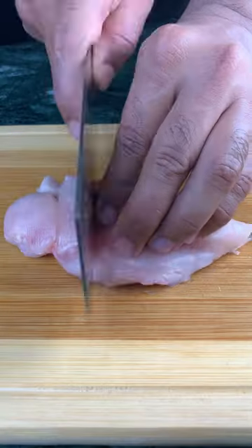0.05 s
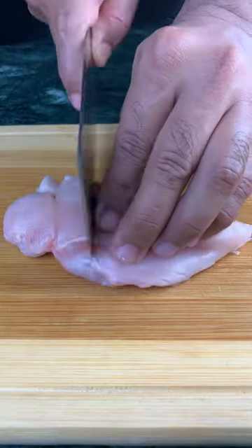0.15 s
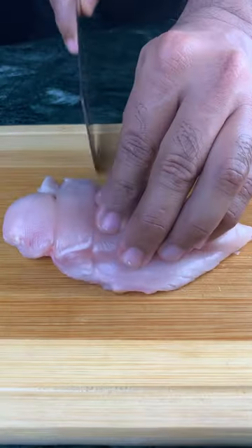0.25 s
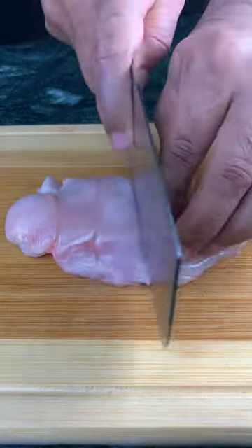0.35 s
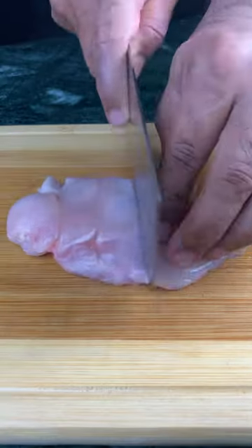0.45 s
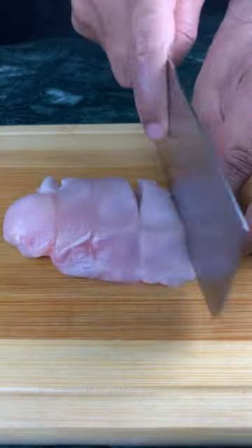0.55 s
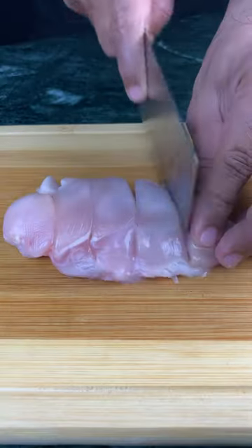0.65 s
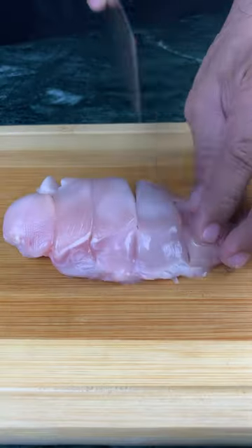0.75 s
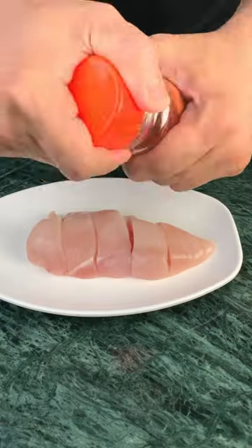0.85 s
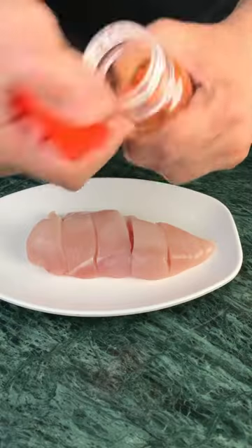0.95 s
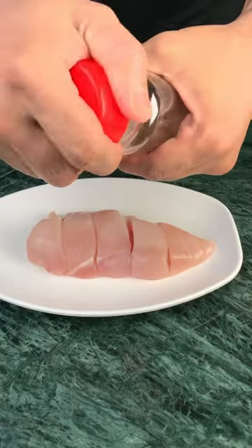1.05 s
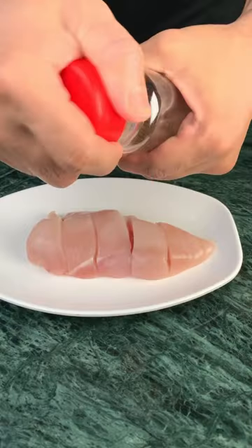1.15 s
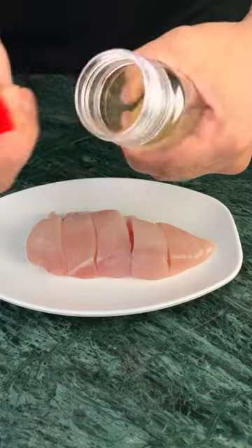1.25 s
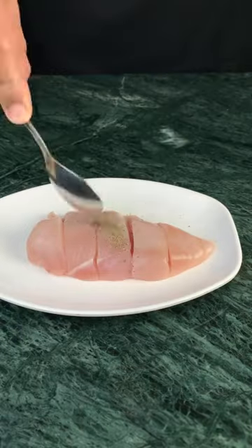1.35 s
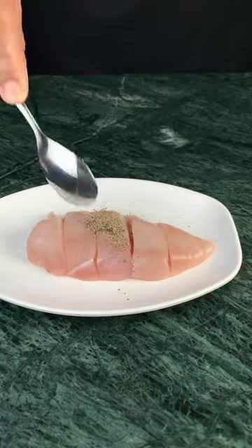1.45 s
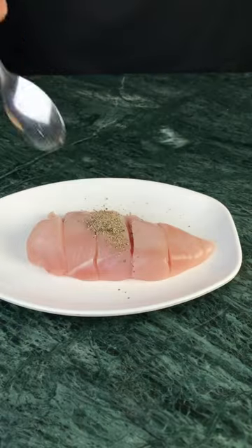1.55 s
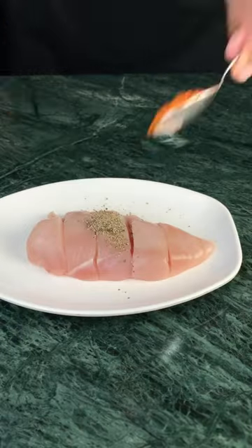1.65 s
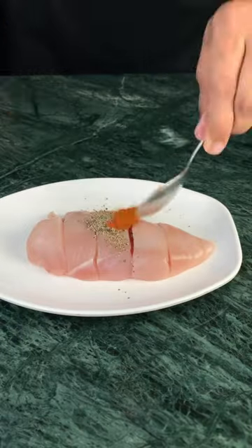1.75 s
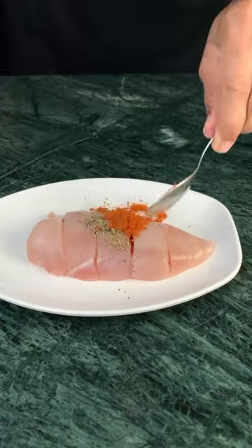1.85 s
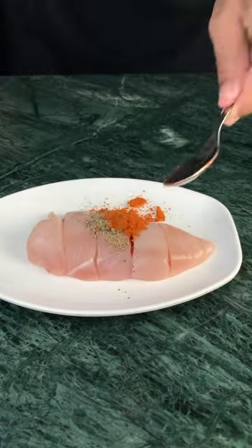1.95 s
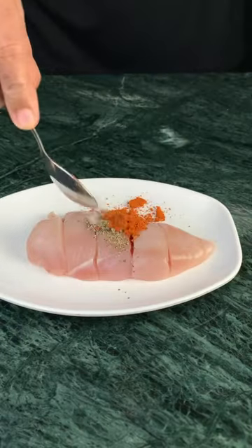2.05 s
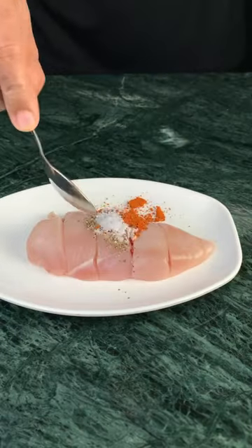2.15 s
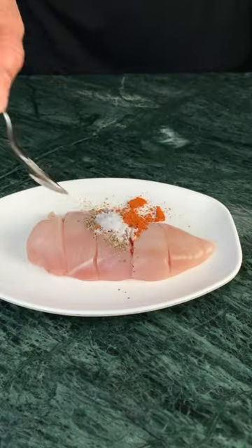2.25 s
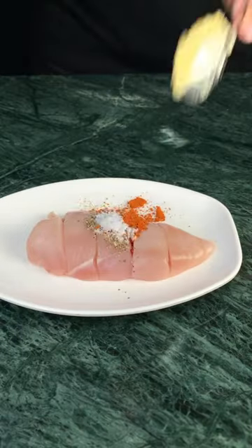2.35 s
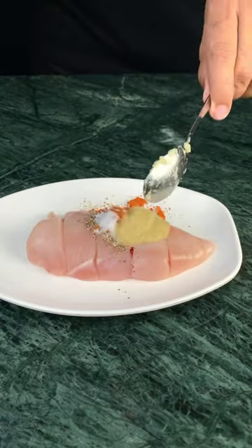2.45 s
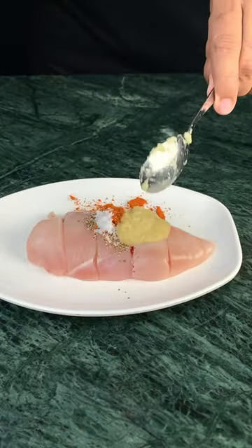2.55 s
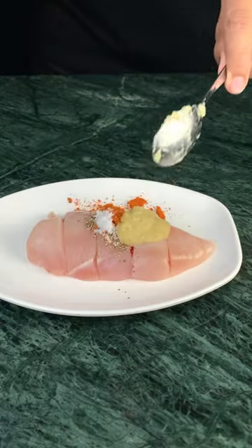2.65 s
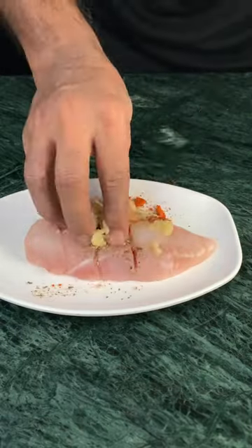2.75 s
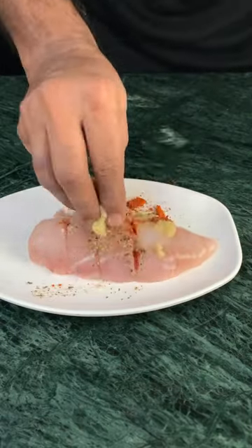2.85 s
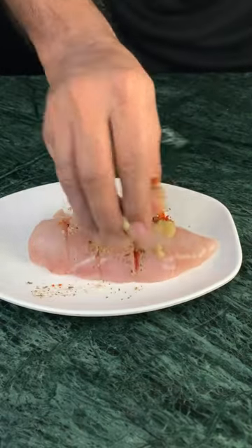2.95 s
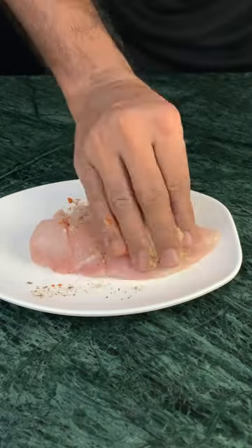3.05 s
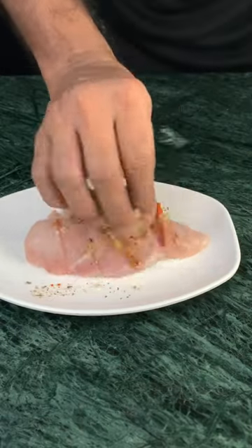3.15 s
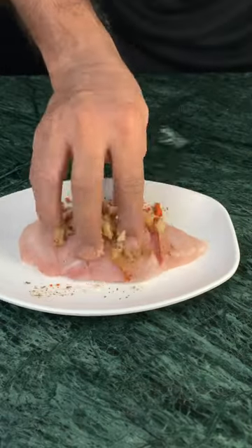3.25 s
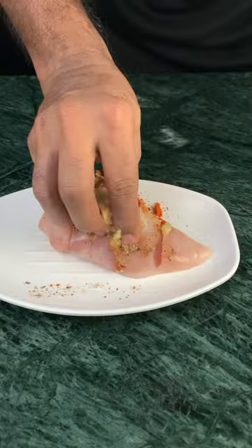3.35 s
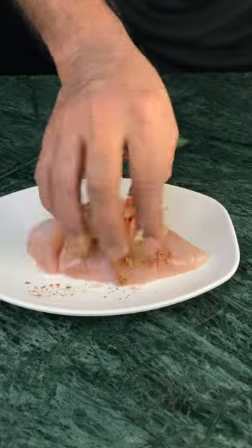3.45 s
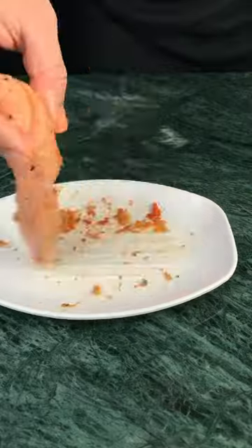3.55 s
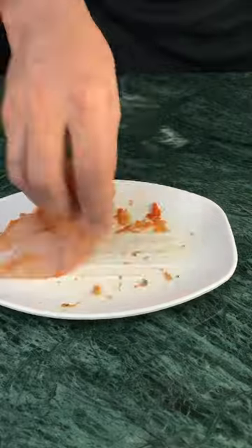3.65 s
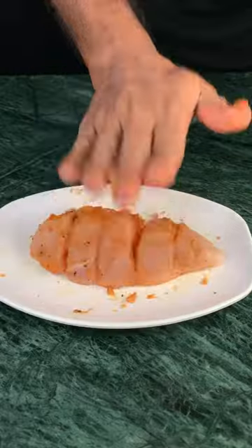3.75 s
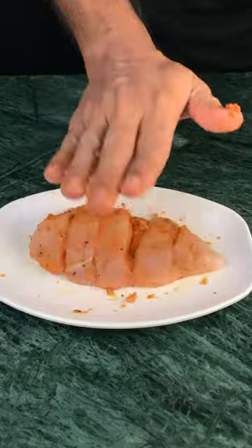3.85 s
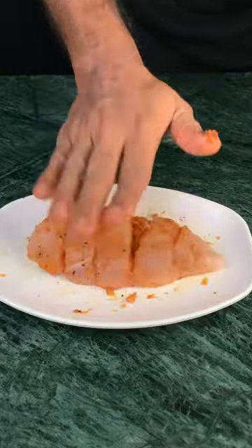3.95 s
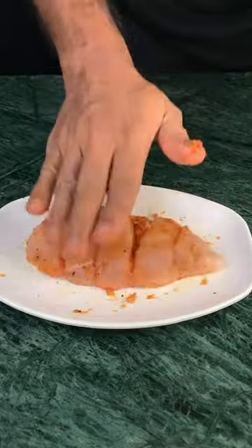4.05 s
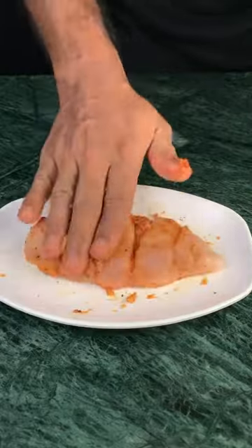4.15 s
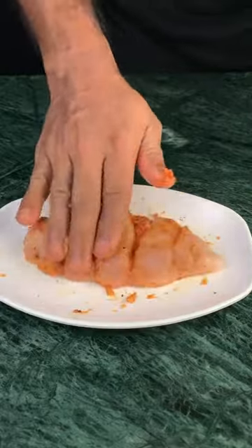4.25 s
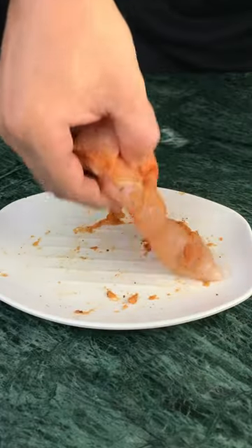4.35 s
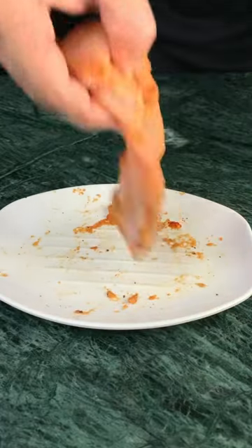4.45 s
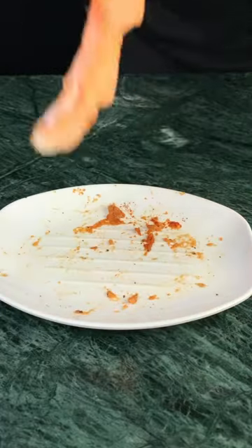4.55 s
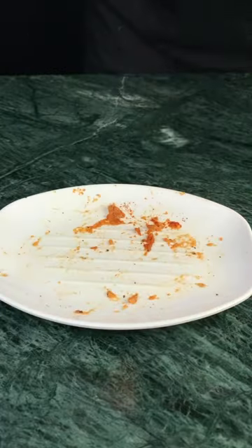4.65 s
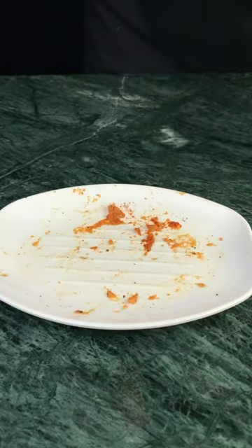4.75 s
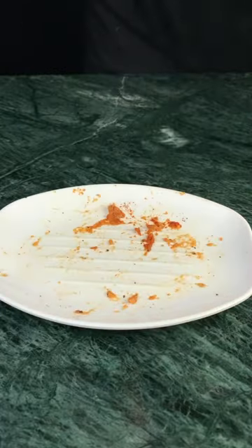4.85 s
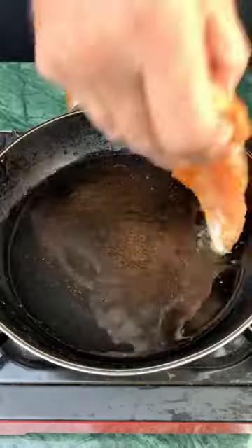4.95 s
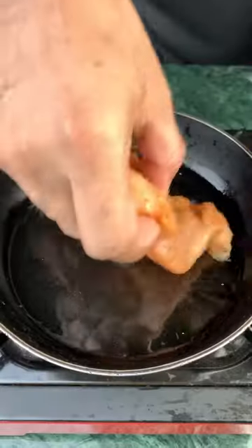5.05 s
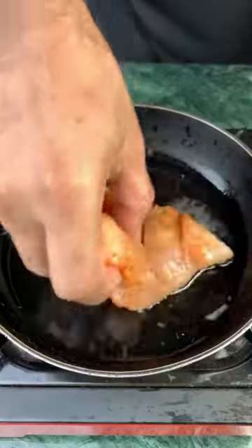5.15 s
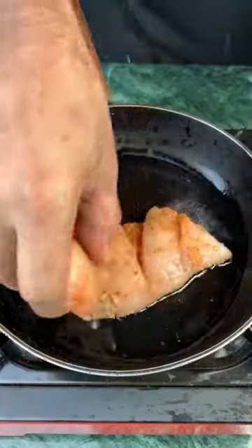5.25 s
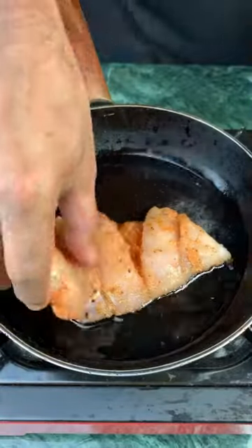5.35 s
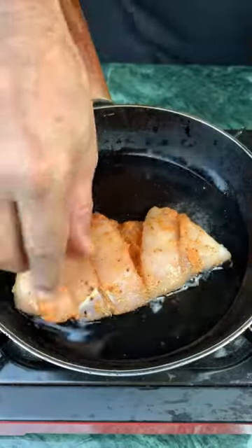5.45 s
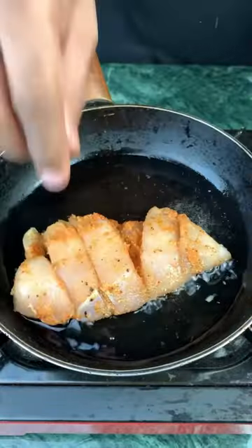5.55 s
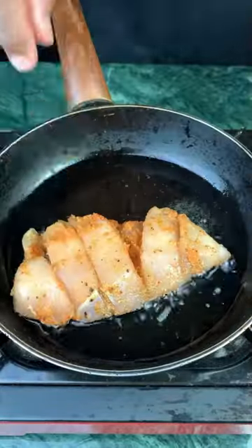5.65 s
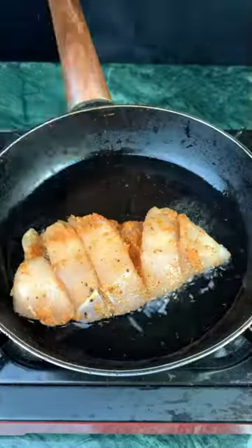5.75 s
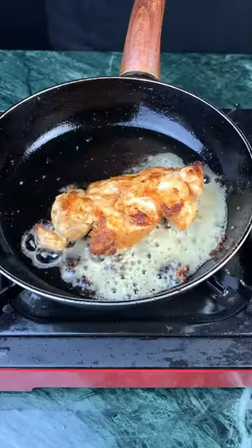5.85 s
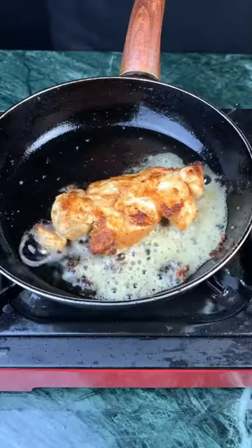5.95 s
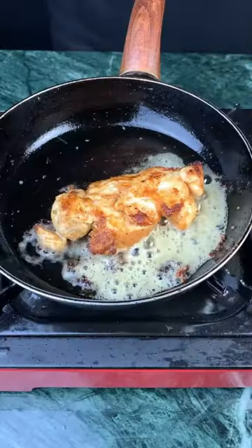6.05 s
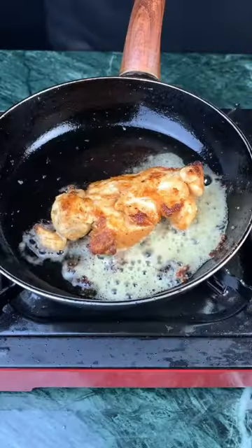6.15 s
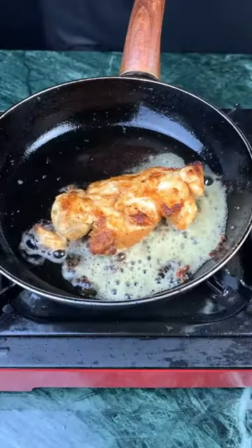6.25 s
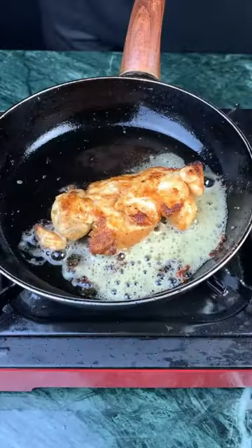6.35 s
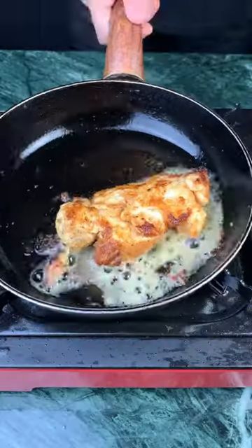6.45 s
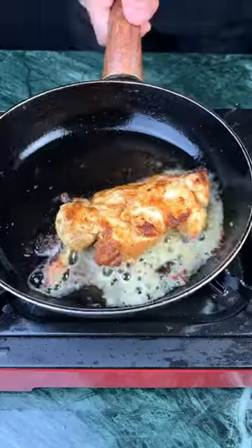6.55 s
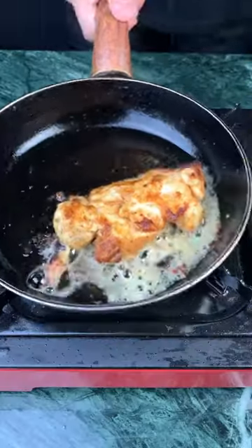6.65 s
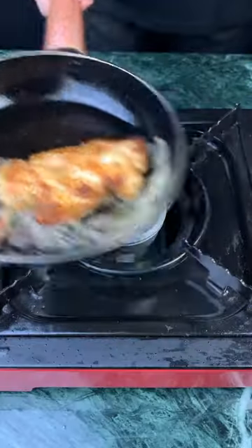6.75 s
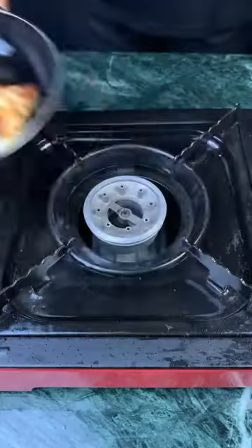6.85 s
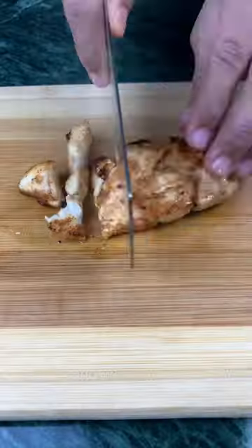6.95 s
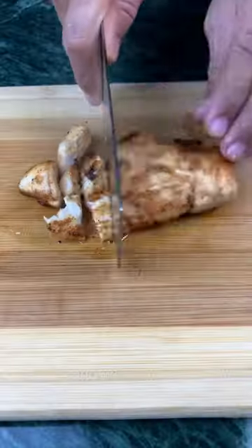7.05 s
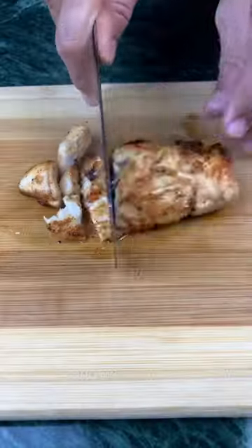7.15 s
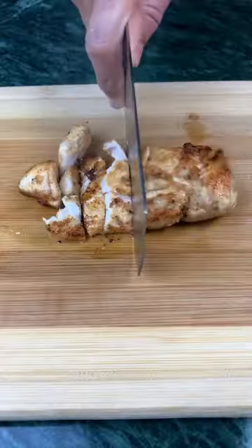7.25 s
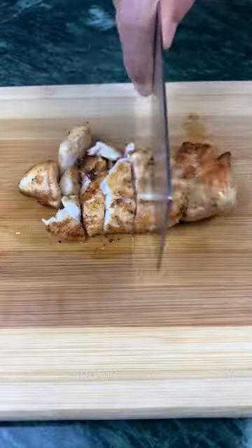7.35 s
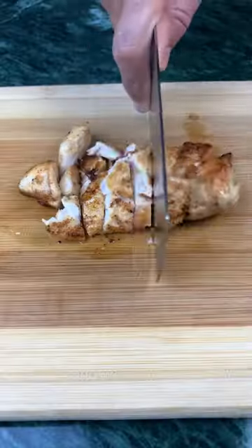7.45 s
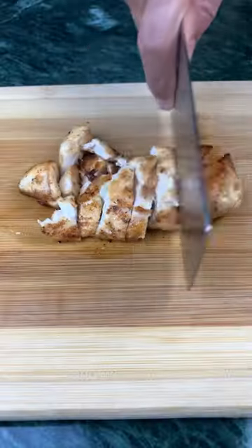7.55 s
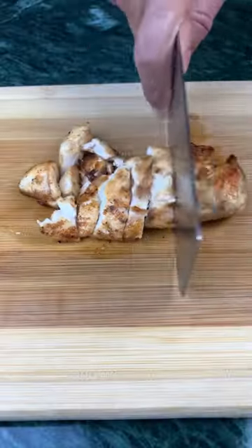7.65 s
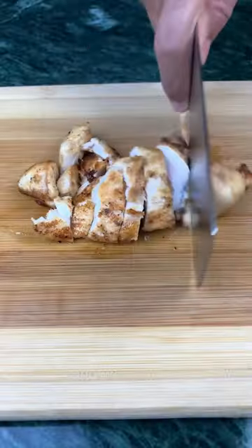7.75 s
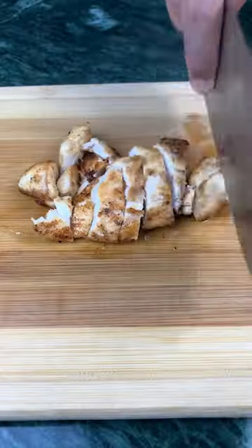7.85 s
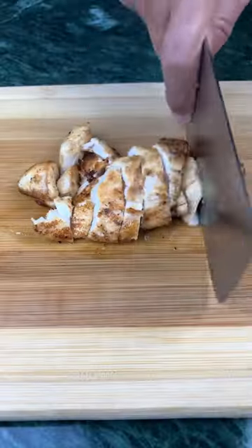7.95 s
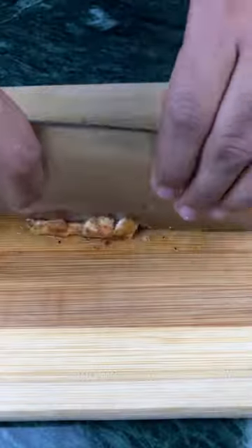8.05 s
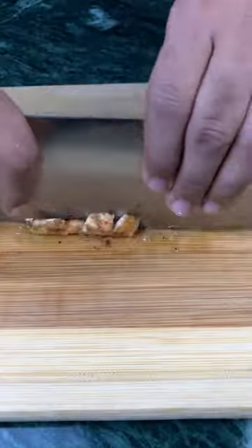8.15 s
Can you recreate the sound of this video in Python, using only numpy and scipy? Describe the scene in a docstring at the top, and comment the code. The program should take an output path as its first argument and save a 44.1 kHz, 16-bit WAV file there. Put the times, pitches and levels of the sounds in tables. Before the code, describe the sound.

Close to a phone in a hard-walled kitchen, a blade hisses and smacks through raw chicken. Two plastic lids pop off jars with a hollow boom. After a quiet gap of hum and draught, fingers knead and pat wet, sticky meat. Meat hits hot fat and sizzles in three abruptly cut shots, the pan drags off the stove with a ringing clatter, then a knife chops hard on a wooden board.

```python
"""First a knife hisses and smacks through raw chicken on a board, close to a phone in a kitchen; hard cuts follow.
Two jar lids pop: noise and a jar ringing at two pitches. Fingers knead and pat wet meat on a plate: short cavity
tones, noise and spray. Meat sizzles in a pan, bands of popping noise, until the pan is dragged off the stove and
its metal modes ring. Last the knife chops: a crack over the ringing modes of the board.
A draught thumps on the microphone over the hum of the room; each shot after the first swells in after its cut."""
import sys
import numpy as np
from scipy import signal
from scipy.fft import rfft, irfft, next_fast_len
from scipy.io import wavfile
from scipy.ndimage import uniform_filter1d

SR = 44100
rng = np.random.default_rng(int(sys.argv[2]) if len(sys.argv) > 2 else 0)


def transcribe(u):
    """Save the signal u as a 16-bit wav file named by the first command-line argument.

    u: samples, shape (n,) or (channels, n), limited to [-1, 1]; the rate is SR.
    q: integer samples, one column per channel.
    """
    v = np.clip(np.atleast_2d(u).T, -1, 1)
    q = np.round(v * 32767).astype(np.int16)
    wavfile.write(sys.argv[1], SR, q)


N = 361619
T = np.arange(N) / SR


def undb(db):
    """Amplitude factor of a level in dB."""
    return 10 ** (np.asarray(db) / 20)


def unit(x):
    """Scale to an RMS of 1."""
    return x / np.sqrt(np.mean(x ** 2, axis=-1, keepdims=True))


def band(x, lo_hz, hi_hz):
    """Keep one band of the spectrum."""
    sos = signal.butter(2, [lo_hz, min(hi_hz, .45 * SR)], "bandpass", fs=SR, output="sos")
    return signal.sosfilt(sos, x)


def colour(x, points, share=1):
    """Shape a spectrum by points (frequency [Hz], level [dB]), the levels multiplied by share."""
    hz, db = np.transpose(points)
    size = next_fast_len(N)
    f = np.maximum(np.fft.rfftfreq(size, 1 / SR), 1)
    gain = undb(share * np.interp(np.log(f), np.log(hz), db))
    return irfft(rfft(x, size) * gain, size)[..., :N]


def walk(rate):
    """Slow chance with a spread near 1, from random steps at rate [1/s], smoothed twice."""
    k = int(SR / rate)
    steps = np.repeat(rng.standard_normal(N // k + 1), k)
    return 1.63 * uniform_filter1d(uniform_filter1d(steps, k), k)[:N]


def fall(t60):
    """A quarter-second decay that sinks 60 dB in t60 [s]."""
    return np.exp(-np.log(1000) * T[:SR // 4] / t60)


def ring(hz, t60):
    """A decaying tone."""
    return np.sin(2 * np.pi * hz * T[:SR // 4]) * fall(t60)


def puff(lo_hz, hi_hz, t60):
    """A decaying burst of noise, peak 1."""
    x = band(rng.standard_normal(SR // 4) * fall(t60), lo_hz, hi_hz)
    return x / np.abs(x).max()


def click(lo_hz, hi_hz):
    """A bare snap, one filtered impulse, peak 1."""
    x = band(np.eye(1, SR // 4, 8)[0], lo_hz, hi_hz)
    return x / np.abs(x).max()


def soft(x):
    """A soft contact takes a moment to press home and rounds the attack."""
    contact_s = 0.0005
    return x * np.minimum(T[:len(x)] / max(contact_s, 1 / SR), 1)


def hump(db, start, end, rise_db_s, fall_db_s):
    """Gain that climbs to db, holds from start to end and sinks; slopes in dB/s."""
    t = T[::40]
    below_db = rise_db_s * np.maximum(start - t, 0) + fall_db_s * np.maximum(t - end, 0)
    return np.interp(T, t, undb(db - below_db))


# hard cuts between the shots: (time [s])
CUT_TIMES = [.058, .2905, .549, .797, 1.028, 1.306, 1.672, 2.018, 2.376, 2.752, 3.492, 3.765, 4.309, 4.886,
             5.867, 6.406, 6.951, 7.191, 7.364, 7.531, 7.69, 7.85, 8.01]
SHOT = np.array([0] + [int(s * SR) for s in CUT_TIMES] + [N])  # shot edges in samples


def in_shot(s):
    """1 during the shot that holds second s."""
    k = np.searchsorted(SHOT, s * SR, "right")
    out = np.zeros(N)
    out[SHOT[k - 1]:SHOT[k]] = 1
    return out


def add(out, s, x):
    """Mix in a sound at second s; the next cut ends it."""
    i = int(s * SR)
    end = min(SHOT[np.searchsorted(SHOT, i, "right")], i + len(x))
    out[i:end] += x[:end - i]


# gusts on the microphone: (full from [s], hold [s], level [dB], flutter frequency [Hz])
WIND_GUSTS = [(.1, 0.0068, -25.5, 76.57), (.22, 0, -30.5, 79.43), (.61, 0.068, -31.5, 80.62),
              (.84, 0.002, -36, 73.7), (1.07, 0, -30, 64.43), (1.36, 0, -25.5, 57.94),
              (1.45, 0.38, -35, 58.25), (1.73, 0.22, -33, 60.22), (2.07, 0.74, -33, 60),
              (2.42, 0.92, -33, 58), (4.17, 0.0054, -41, 89.04), (4.55, 0.42, -33.5, 57.37),
              (4.96, 0, -26.5, 81.66), (7.0, 0.025, -27.5, 85.1), (7.95, 0.19, -48, 86.9)]
# spectrum of the kitchen hum, before its levels are set: (frequency [Hz], relative level per Hz [dB])
KITCHEN_SPECTRUM = [(45, -41.5), (75, -17), (110, -13.5), (200, -15), (400, -20), (650, -31.5), (1700, -38),
                    (3500, -46), (7000, -53), (9500, -62.5), (12000, -54.5), (14000, -55), (15000, -86.5)]
# microphone places: (from [s], low hum level [dB], upper hiss level [dB], fade-in after each cut [s])
MIC_SETUPS = [(0, -46, -52.5, 0.027), (.797, -45, -59.5, 0.036), (1.304, -50.5, -60.5, 0.031),
              (2.753, -44.5, -59.5, 0.045), (3.765, -42, -58, 0.046), (4.307, -49, -59.5, 0.028),
              (4.886, -45, -54.5, 0.029), (6.951, -43, -54, 0.039)]
GUST_RISE_DB_S, GUST_FALL_DB_S, STILL_AIR_DB = 297.5, 187, -65


def air():
    """Draught buffets both ports nearly alike; the kitchen hum gains width from about 460 Hz up."""
    wind = undb(STILL_AIR_DB)
    for s, hold, db, _ in WIND_GUSTS:
        wind = wind + hump(db, s, s + hold, GUST_RISE_DB_S, GUST_FALL_DB_S) * in_shot(s)
    gust_s, _, _, gust_hz = np.transpose(WIND_GUSTS)
    turn = np.exp(2j * np.pi * np.cumsum(np.interp(T, gust_s, gust_hz)) / SR)
    lowpass = signal.butter(2, 24., fs=SR, output="sos")
    eddies = signal.sosfilt(lowpass, rng.standard_normal((4, N)))
    # slow eddies moved up to the flutter frequency
    gust, leak = unit(np.real((eddies[:2] + 1j * eddies[2:]) * turn)) * wind
    opposite = np.array([[1], [-1]])

    mid, side = colour(rng.standard_normal((2, N)), KITCHEN_SPECTRUM)
    hum = mid + band(side, 460, 15000) * undb(-2.5) * opposite
    low = colour(hum, [(600, 0), (1300, -30)])
    high = hum - low
    start, hum_db, hiss_db, _ = np.transpose(MIC_SETUPS)
    setup = np.searchsorted(start[1:], T)
    hum = unit(low) * undb(hum_db[setup] + 2 * walk(16.0)) + unit(high) * undb(hiss_db[setup] + walk(4.5))
    return gust + undb(-13.5) * leak * opposite + hum


# echo of the hard walls, band by band: (centre [Hz], t60 [s], relative level [dB])
WALL_ECHO = [(150.7, 0.98, -22.5), (512, 0.83, -21.5), (1570, 0.2, -11.5), (3080, 0.11, -23),
             (6340, 0.11, -8), (11900, 0.18, -19.5)]


def room(x):
    """Diffuse echo of hard walls, other in each ear; each band dies at its own rate; no echo crosses a cut."""
    t = T[:SR // 2]
    tail = 0
    for hz, t60, db in WALL_ECHO:
        noise = band(rng.standard_normal((2, len(t))), hz / 2.0, hz * 1.43)
        tail = tail + undb(db - 22.0) * noise * np.exp(-np.log(1000) * t / t60)
    tail = tail * np.minimum(t / 0.0025, 1)
    echoes = [signal.fftconvolve(x[None, a:b], tail, axes=1)[:, :b - a] for a, b in zip(SHOT, SHOT[1:])]
    return np.hstack(echoes)


# shading by the phone's body, shared out between the ports: (frequency [Hz], left over right, unscaled [dB])
PORT_SHADE = [(60, 0), (200, .5), (380, -1), (700, -2.5), (1290, -5.5), (2380, -4.5), (4400, -2.5),
              (8120, -.5), (15000, 0)]
# lead of the left port, before the frequency stretch: (frequency [Hz], counter [rad], pan [rad])
PORT_LEAD = [(0, 0, 0), (1000, -.6, -.6), (2200, -.7, -.2), (3300, .1, .6), (4000, .9, .8),
             (8200, 2.5, 3.14), (12300, 5.6, 6.4), (16000, 7.5, 9.8)]


def ports(x, col, stretch=0.94):
    """Two microphone ports: frequency-dependent phase parts them, and the phone's body shades them."""
    size = next_fast_len(N)
    lead_table = np.array(PORT_LEAD)
    lead = np.interp(np.fft.rfftfreq(size, 1 / SR) / stretch, lead_table[:, 0], lead_table[:, col])
    late = irfft(rfft(x, size) * np.exp(-1j * lead), size)[:N]
    return np.array([colour(x, PORT_SHADE, .62), colour(late, PORT_SHADE, -.62)])


MARINADE_S = [(2.76, 3.49), (3.64, 4.42)]  # spans in which the film of sauce crackles, from-to
MARINADE_DB, RUSTLE_DB = -47, -61.5  # median snap before filtering, mid level of the rustle


def marinade():
    """Tiny threads of sauce snap at random between the smacks, over the rustle of sliding fingers."""
    kneading = sum((T > a) & (T < b) for a, b in MARINADE_S)
    snap_gain = undb(13.7 * rng.standard_normal(N) + MARINADE_DB)
    snaps = (rng.random(N) < 22 / SR) * kneading * snap_gain  # 22 per second
    rustle = unit(band(rng.standard_normal(N), 1700, 3900)) * kneading * undb(RUSTLE_DB + walk(30))
    return rustle + signal.fftconvolve(snaps, puff(4000, 15000, .008)[:800])[:N]


# strokes of blade or lid: (start [s], strongest [s], end [s], level [dB], low part level [dB])
RUB_STROKES = [(0.033, 0.104, 0.64, -49, -64), (0.174, 0.362, 0.91, -39.5, -47),
               (0.482, 0.637, 0.8, -44, -59), (0.647, 0.692, 0.72, -25.5, -34.5),
               (0.82, 0.928, 3.2, -56, -47.5), (1.142, 1.168, 1.298, -30.5, -28.5),
               (7.01, 7.057, 7.1, -33.5, -48), (8.07, 8.1, 8.17, -36, -39)]
STROKE_EDGE_DB = 33  # how far a stroke lies below its peak at start and end


def rubbing():
    """Steel through wet flesh, plastic on thread: a fine, slightly grainy hiss."""
    grain = rng.standard_normal(N) * undb(0.7 * walk(58))
    fine = coarse = 0
    for start, top, end, db, low_db in RUB_STROKES:
        rise_db_s = STROKE_EDGE_DB / max(top - start, .001)
        fall_db_s = STROKE_EDGE_DB / max(end - top, .001)
        press = hump(0, top, top, rise_db_s, fall_db_s) * in_shot(top)
        fine = fine + undb(db) * press
        coarse = coarse + undb(low_db) * press
    return fine * unit(band(grain, 5500, 22000)) + coarse * unit(band(grain, 850, 2300))


# lid snaps: (time [s], level [dB], jar pitch [Hz], jar re level [dB], click re level [dB])
LID_SNAPS = [(0.925, -9, 353, -11, -37), (0.929, -23.5, 229, 7, 11.5), (0.938, -4, 223, -13, -25.5),
             (0.945, -13.5, 208, 5, -21), (1.176, -14, 356, -6, 7), (1.181, -6.5, 252, -1, -21)]


def lids():
    """Plastic snaps over the rim and the air in the jar booms at two pitches."""
    out = np.zeros(N)
    for s, db, hz, jar_db, click_db in LID_SNAPS:
        jar = ring(hz, 0.069) + undb(-7.5) * ring(2.11 * hz, 0.055)
        snap = click(3870, 14000) + undb(7.0) * puff(6400, 21000, 0.026)
        add(out, s, undb(db) * (puff(420, 8200, 0.026) + undb(jar_db) * jar + undb(click_db) * snap))
    return out


def wet_cavity(hz, t60):
    """A small wet cavity opens: a short tone, noise near its pitch and broader noise below."""
    tone = undb(-2.0) * ring(hz, 0.58 * t60)
    near_noise = undb(-4.5) * puff(hz / 1.26, hz * 1.166, 1.4 * t60)
    broad_noise = undb(-6.0) * puff(hz / 4.9, hz * 1.66, 1.54 * t60)
    return tone + near_noise + broad_noise


# blade through raw meat to the wood: (time [s], low cavity [Hz], its level [dB], high cavity [Hz],
# its level [dB], spray level [dB], thud level [dB], decay scale [s])
BLADE_SLICES = [(.2552, 1735, -0.5, 3200, -12.5, -26, -29, 0.0096),
                (.2602, 1040, -14.5, 2240, -29, -32, -15, 0.021),
                (.276, 896, -22, 2030, -42, -42, -28, 0.26),
                (.3645, 690, -38.5, 2240, -49, -36, -55, 0.018),
                (.375, 1430, -34, 2160, -34, -21.5, -45, 0.03),
                (.669, 1280, -12.5, 2280, -24, -30, -38, 0.014),
                (.6735, 1160, -15.5, 2250, -31, -44, -26, 0.03),
                (.691, 925, -28, 2280, -23, -45, -30, 0.038), (.703, 880, -36, 2390, -34, -34, -28, 0.1),
                (.81, 1880, -33, 2020, -36, -44.5, -60, 0.014)]
# wet smacks of fingers on meat: (time [s], low cavity [Hz], its level [dB], high cavity [Hz],
# its level [dB], spray level [dB], thud of the plate level [dB])
FINGER_SMACKS = [(2.758, 1230, -22, 2280, -24, -24.5, -28), (2.8709, 1530, -43, 1960, -24, -30.5, -27.5),
                 (2.9635, 890, -56, 3320, -47, -60, -54), (3.0558, 1000, -55, 1680, -55, -39, -37),
                 (3.0648, 890, -49, 3280, -48, -40, -46), (3.1263, 3070, -30, 1880, -21, -32.5, -27),
                 (3.214, 880, -50, 2240, -30, -40, -29.5), (3.2477, 1230, -26.5, 2200, -26, -39, -27),
                 (3.2921, 1370, -43, 2240, -32, -39, -30.5), (3.308, 1250, -27, 2400, -27, -31, -32.5),
                 (3.377, 1010, -55, 2150, -32.5, -35.5, -32), (3.6668, 1430, -44, 2850, -31.5, -25, -30.5),
                 (3.7902, 1380, -25, 2300, -18.5, -25.5, -20), (3.8311, 1190, -29, 1920, -25, -24.5, -33),
                 (3.924, 1200, -22, 3000, -29, -15.5, -24.5), (3.9292, 1370, -25, 2370, -26, -36, -45),
                 (3.9548, 970, -41, 2060, -35, -34, -30), (3.9703, 910, -32, 1880, -30, -35, -31),
                 (4.022, 1020, -24.5, 2320, -23.5, -17.5, -26.5), (4.0549, 900, -37, 2078, -24.5, -30, -26),
                 (4.0854, 920, -30, 2080, -30.5, -39, -38), (4.1355, 1500, -27, 1820, -36, -19.5, -25),
                 (4.191, 1190, -31.5, 2100, -30.5, -29.5, -27), (4.215, 1080, -41, 1810, -48, -38, -33),
                 (4.2685, 1105, -28, 2060, -28.5, -28, -34), (4.342, 1800, -59, 6400, -49, -34, -51),
                 (4.3603, 1800, -51, 7300, -42, -40, -52), (4.3748, 1860, -44, 3130, -23, -34, -41),
                 (4.9449, 1640, -49, 3600, -27.5, -24, -55), (4.966, 925, -54, 3530, -42, -20, -41)]
SMACK_DECAY_S = 0.045  # decay scale of every smack


def wet(events):
    """Each touch opens two small wet cavities, snaps, throws a fine spray and knocks what lies below."""
    out = np.zeros(N)
    for s, low_hz, low_db, high_hz, high_db, spray_db, thud_db, t60 in events:
        cavity = undb(low_db) * wet_cavity(low_hz, t60) + undb(high_db) * wet_cavity(high_hz, t60)
        spray = undb(4.0) * click(3900, 19000) + undb(7.5) * puff(5800, 11240, 0.012)
        spray = spray + undb(-16.5) * puff(4500, 17000, 0.38 * t60)
        add(out, s, soft(cavity + undb(thud_db) * puff(83, 580, 0.12)) + undb(spray_db) * spray)
    return out


# the three pan shots: (sizzle full [s], end [s], base level [dB], fine spray re base [dB],
# big bubbles re base [dB], their delay [s], share of single pops [factor])
SIZZLE_SHOTS = [(5.008, 5.86, -29, 7, 1, 0.53, 0.47), (5.87, 6.419, -36.5, 7, -2, 0.13, 0.86),
                (6.409, 6.798, -28.5, -2.5, -7.5, 0.17, 1.55)]
# bands of bubble size, in turn small, fine spray, big, deepest: (low edge [Hz], high edge [Hz])
BUBBLE_BANDS = [(4200, 8200), (8200, 14000), (1850, 4200), (500, 1850)]
# big fat bursts in the pan: (time [s], fine snap level [dB], deeper pop level [dB])
FAT_BURSTS = [(5.0596, -5, -22.5), (5.063, -16, -12), (5.08, 3, -24.5), (5.0945, -3.5, -11),
              (5.112, -6.5, -17), (5.1224, -9, -13), (5.2005, -17, -16), (5.209, -8, -6),
              (5.2366, -15, -19), (5.4352, -5.5, -20), (5.6889, -2, -30), (5.7793, -3, -22),
              (5.912, -17, -18), (5.9195, -13, -27), (5.9352, -11.5, -12), (5.9598, -2, -11.5),
              (5.9696, -11.5, -27), (6.006, -6, -13), (6.013, -12.5, -12), (6.0412, -3.5, -17),
              (6.0803, -4, -13), (6.0948, -12, -14.5), (6.2065, -5, -11), (6.2154, -10, -26),
              (6.2233, -9, -24), (6.2322, -9, -9.5), (6.2363, -0.5, -14), (6.244, -12.5, -17),
              (6.287, -8.5, -34), (6.3034, -8, -15), (6.3076, -3, -28), (6.33, -7.5, -23),
              (6.4499, -11, -7), (6.4587, -1.5, -13), (6.465, -14.5, -37), (6.4712, -13, -18),
              (6.478, -12, -12), (6.5618, -13, -6), (6.5705, -15, -14), (6.5739, -6, -23),
              (6.6206, -6, -27), (6.6318, -10, -11), (6.6453, -10, -27), (6.6492, -12, -30),
              (6.6848, -5, -29), (6.6922, -8, -19), (6.718, 1.5, -23), (6.935, -4, -20)]
# meat or pan settles: (time [s], peak level [dB])
SETTLING_THUDS = [(4.992, -24.5), (5.825, -23), (6.172, -22)]
# how much of the flare reaches each band, small bubbles then fine spray: (share [factor])
FLARE_PART = [
    [0.52],
    [0.46],
]
SIZZLE_RISE_DB_S, SIZZLE_FALL_DB_S, SPRAY_EARLY_S, BIG_RISE_DB_S = 595, 61, 0.014, 13
# the fall sets in just before the rise is complete
FLARE_FULL_S, FLARE_FALL_FROM_S, FLARE_DB, FLARE_RISE_DB_S, FLARE_FALL_DB_S = 5.065, 5.06, 6, 487, 108


def frying():
    """Many steam bubbles burst under the meat and further round the pan; a few are big."""
    size_db = np.minimum(1.74 * rng.exponential(size=(2, N)), 15)
    pops = (rng.random((2, N)) < 300 / SR) * undb(size_db)  # 300 per second at each spot
    pops = uniform_filter1d(pops, size=30) * 30  # each lasts 30 samples
    lively, gains = 0, 0
    for full, end, db, spray_db, big_db, late, share in SIZZLE_SHOTS:
        heat = [hump(db + d, full - early, end, SIZZLE_RISE_DB_S, SIZZLE_FALL_DB_S)
                for d, early in [(0, 0), (spray_db, SPRAY_EARLY_S), (big_db, 0), (-19, 0)]]
        heat[2] = heat[2] * hump(0, full + late, end, BIG_RISE_DB_S, 0)
        gains = gains + np.array(heat) * in_shot(full)
        lively = lively + share * in_shot(full)
    # wet meat meets the fat and the small bubbles and spray flare
    flare = hump(FLARE_DB, FLARE_FULL_S, FLARE_FALL_FROM_S, FLARE_RISE_DB_S, FLARE_FALL_DB_S)
    gains[:2] *= 1 + np.array(FLARE_PART) * flare
    spots = 0
    for hz, gain in zip(BUBBLE_BANDS, gains):
        popping = rng.standard_normal((2, N)) * (1 + lively * pops)
        spots = spots + unit(band(band(popping, *hz), *hz)) * gain * undb(walk(25))
    spots = spots * undb([[1.5], [-5]])  # under the meat, round the pan
    for s, snap_db, pop_db in FAT_BURSTS:
        snap = undb(-2.5) * click(4900, 8000) + undb(2.0) * puff(6000, 13300, 0.0079)
        add(spots[0], s, undb(snap_db) * snap + undb(pop_db) * puff(2010, 5400, 0.0092))
    for s, peak_db in SETTLING_THUDS:
        add(spots[0], s, undb(peak_db) * puff(90, 570, 0.035))
    return spots


# the pan catches: (time [s], level [dB], clang tilt [dB per octave],
# longest t60 until the grate damps it, shorter for broad modes [s])
PAN_JOLTS = [(6.697, -10, 7, 0.092), (6.708, -9, 3, 0.067), (6.72, -19, 21, 0.092), (6.7426, -2, 20, 0.1),
             (6.752, -3, -24, 0.13), (6.764, -2.5, -5, 0.14), (6.781, -3.5, 19, 0.11),
             (6.7936, -4.5, -23, 0.095), (6.826, -13, 21, .05), (6.836, -3.5, -16, 0.083),
             (6.8703, -15, 27, .15), (6.883, -16, 33, 0.081)]
# modes of the thin metal: (frequency [Hz], nominal width [Hz], level [dB])
PAN_MODES = [(486, 39, -15.5), (863, 35, -25), (1080, 85, 7.5), (1547, 110, 10), (1980, 140, -12),
             (2302, 36, -6), (3520, 110, -9), (3830, 150, -7.5), (4280, 120, -34.5)]
# pan sliding over the grate
DRAG_FROM_S, DRAG_TO_S, DRAG_DB, DRAG_RISE_DB_S, DRAG_FALL_DB_S = 6.705, 6.89, -30, 497, 600
CHATTER_DB, CHATTER_FALL_DB_S = -22.5, 698  # relative to each catch, which shakes the slide up for a moment


def pan():
    """Stick-slip clicks and a few hard catches ring the thin metal."""
    slide = hump(DRAG_DB, DRAG_FROM_S, DRAG_TO_S, DRAG_RISE_DB_S, DRAG_FALL_DB_S)
    for s, db, *_ in PAN_JOLTS:
        slide = slide + hump(db + CHATTER_DB, s, s, 9000, CHATTER_FALL_DB_S)
    grit = unit((rng.random(N) < 1400 / SR) * rng.standard_normal(N))  # 1400 per second
    slips = (grit + .4 * rng.standard_normal(N)) * undb(walk(140)) * slide
    modes = 0
    for hz, width, db in PAN_MODES:
        resonator = signal.iirpeak(hz, hz / (1.5 * width), fs=SR)
        modes = modes + undb(db) * np.sqrt(300 / width) * signal.lfilter(*resonator, slips)
    out = undb(11.0) * modes + undb(2.0) * band(slips, 390, 3200)
    for s, db, tilt_db, t60 in PAN_JOLTS:
        clang = 0
        for hz, width, mode_db in PAN_MODES:
            octaves = np.clip(np.log2(hz / 1280), -.6, .6)
            gain = undb(mode_db + tilt_db * octaves + rng.standard_normal())
            pitch = hz * (1 + 0.0035 * rng.standard_normal())
            clang = clang + gain * ring(pitch, t60 * min(50 / width, 1))
        add(out, s, undb(db - 14.5) * (clang + undb(1.0) * puff(300, 4400, 0.015)))
    return out * in_shot(DRAG_FROM_S)


# knife on board: (time [s], crack level [dB], then relative to it: edge click [dB], thud [dB],
# swell before the strike [dB], board ring [dB]; ring tilt [dB per octave],
# factor on the ring time of the board)
KNIFE_CHOPS = [(7.062, -15.5, -20.5, -13, -15, 12, 10, 0.52), (7.246, 2.5, -17, -21.5, -22, -5, 3.5, 1.16),
               (7.428, 2, -14.5, -18.5, -22.5, -4.5, -2, 2), (7.5902, 2, -14, -18.5, -19, 0, -3.5, 1.2),
               (7.7728, 4, -8, -22, -27, -4.5, -5, 1.3), (7.938, 2.5, -12, -19, -18.5, -9, -9, 1.74),
               (8.029, -31, 1, -0.5, -26, 20.5, -15, 0.64)]
# modes of the board, before place and ring time factor alter them: (frequency [Hz], relative level [dB], t60 [s])
BOARD_MODES = [(746, -4, 0.16), (755, -5, 0.17), (890, -14, 0.1), (1034, -4, 0.08), (1220, 2.5, 0.07),
               (1420, -12, 0.05), (1800, -7, 0.049), (2080, -15, 0.086), (4200, -35, .04)]
# the first chops land on a stiffer part of the board
CRACK_HZ, FAR_END_PITCH, FAR_END_UNTIL_S = 2610, 1.035, 7.3


def knife():
    """Noise swells up to the strike; the blade cracks on the wood, board rings, edge clicks, counter thuds."""
    out = np.zeros(N)
    for s, db, edge_db, thud_db, swell_db, ring_db, tilt_db, ring_factor in KNIFE_CHOPS:
        place = FAR_END_PITCH if s < FAR_END_UNTIL_S else 1
        spread = undb(1.5 * rng.standard_normal(len(BOARD_MODES)))
        board = 0
        for chance, (hz, mode_db, t60) in zip(spread, BOARD_MODES):
            gain = chance * undb(mode_db + tilt_db * np.log2(hz / 1000))
            board = board + gain * ring(hz * place, t60 * ring_factor)
        crack = ring(CRACK_HZ * place, 0.022) + undb(-0.5) * puff(1070, 2670, 0.025)
        crack = crack + undb(-26.0) * puff(1900, 3120, 0.31)
        strike = soft(undb(db) * crack + undb(db + ring_db - 17.0) * board)
        edge = undb(db + edge_db) * puff(5000, 22000, 0.0051)
        thud = undb(db + thud_db) * puff(187, 380, 0.1)
        add(out, s, strike + edge + thud)
        # reversed noise swells up to the strike
        swell = puff(890, 8000, 0.038) + undb(-19.5) * puff(1900, 4600, 0.089)
        add(out, s - 1500 / SR, undb(db + swell_db) * swell[1500::-1])
    return out


# colour of the last pan shot: (frequency [Hz], level [dB])
LAST_PAN_COLOUR = [(700, -7.5), (1300, 7.5), (3300, -2.5), (5000, -10), (7000, 4.5), (10000, 1)]


def scene():
    """Everything near the phone, the pan, the air and the walls."""
    smacks = [(*row, SMACK_DECAY_S) for row in FINGER_SMACKS]
    near = knife() + lids() + wet(BLADE_SLICES) + wet(smacks) + marinade() + rubbing() + pan()
    under, around = frying()
    far = ports(around, col=1)
    first_pans = ports(under, col=2) + far
    # the last pan shot has its own colour: strong near 1.3 and 7 kHz, weak near 5 kHz
    last_pan = colour(ports(under, col=2, stretch=1.23) + far, LAST_PAN_COLOUR)
    fat = np.where(T < 6.406, first_pans, last_pan)
    return ports(near, col=1) + fat + air() + room(near + under + around)


def record(dry):
    """The microphone drops deep bass and top air, shots swell in after cuts, and peaks stop at full scale."""
    dry = signal.sosfilt(signal.butter(4, 36., "highpass", fs=SR, output="sos"), dry)
    dry = colour(dry, [(13600, -2.0), (14600, -6.0), (16000, -16.5)])
    start, _, _, fade_s = np.transpose(MIC_SETUPS)
    since_cut = T - SHOT[np.searchsorted(SHOT, np.arange(N), "right") - 1] / SR
    fade_time = np.maximum(fade_s[np.searchsorted(start[1:], T)], .002)
    fade = np.where(T < CUT_TIMES[0], 1, np.minimum(since_cut / fade_time, 1))
    top_cut = signal.ellip(8, .2, 70, 15800, fs=SR, output="sos")  # lowpass at 15800 Hz
    return signal.sosfilt(top_cut, np.clip(dry * fade, -1, 1))


dry = scene()
out = record(dry)
transcribe(out)
```